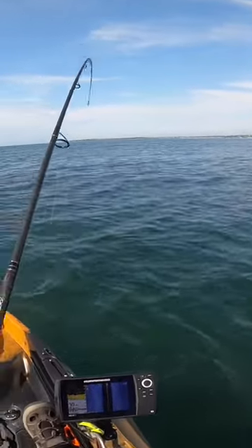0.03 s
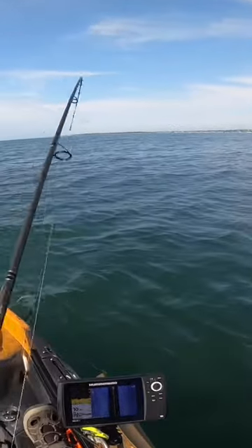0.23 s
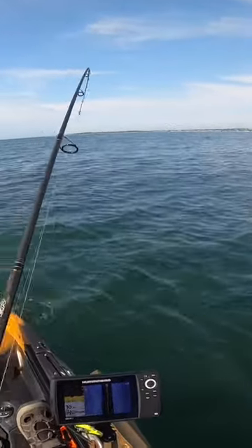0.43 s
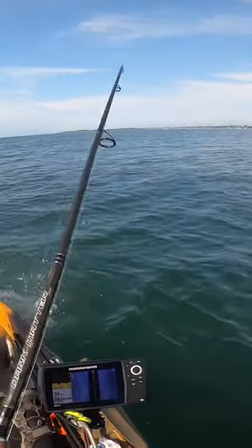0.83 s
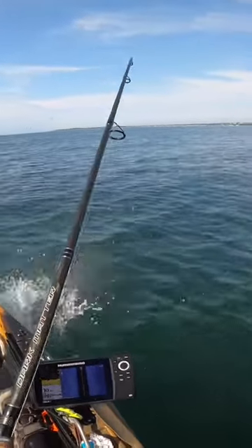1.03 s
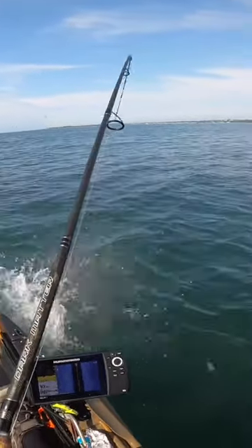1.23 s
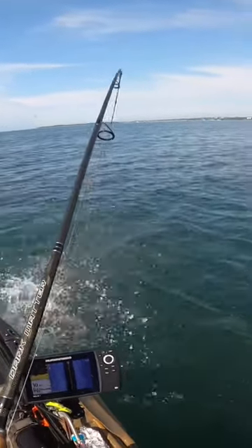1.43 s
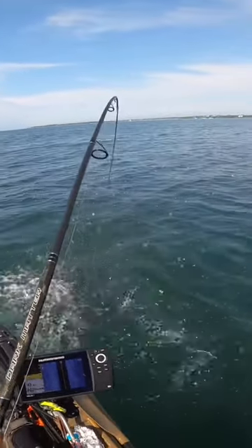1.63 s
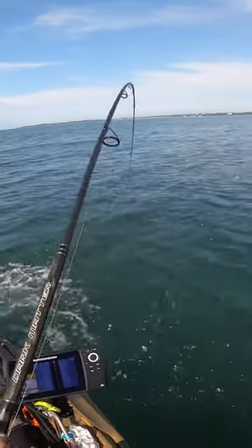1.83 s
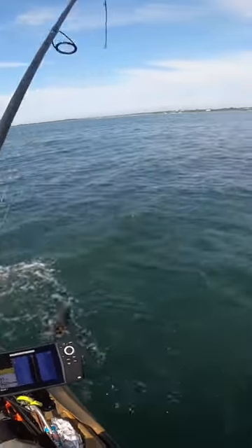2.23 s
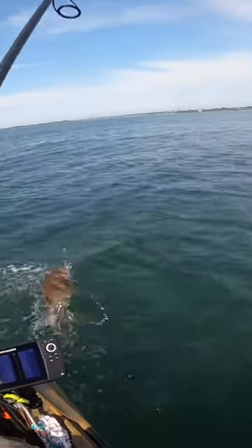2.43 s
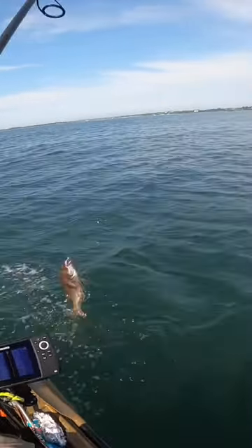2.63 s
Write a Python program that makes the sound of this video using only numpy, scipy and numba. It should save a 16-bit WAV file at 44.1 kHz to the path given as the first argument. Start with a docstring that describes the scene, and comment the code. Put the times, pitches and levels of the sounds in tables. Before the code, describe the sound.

A hooked fish thrashes close beside a kayak in quick, sharp splashes and low thumps. Spray patters down, foam fizzes and drips plop, then the hull knocks twice. Wind rumbles on the microphone over a low sea wash.

```python
"""A hooked fish thrashes at the surface beside a kayak. Each tail slap cracks and drives air under,
which thumps and churns. Spray patters back among ringing bubbles, white water fizzes, then single
drips plop. The hull knocks three times; a motor hums faintly over the wash of the sea, and wind
rumbles on the microphone's two ports."""
import sys
import numpy as np
from scipy import signal
from scipy.fft import rfft, irfft, next_fast_len
from scipy.io import wavfile
from numba import njit

SR = 44100
rng = np.random.default_rng(int(sys.argv[2]) if len(sys.argv) > 2 else 0)


def wrap_up_sound(samples):
    """Save the sound to the file named by the first command line argument, as 16-bit audio."""
    columns = np.atleast_2d(samples).T
    # keep every value between -1 and 1, then stretch to whole-number steps
    tamed = np.clip(columns, -1, 1)
    steps = np.round(tamed * 32767).astype(np.int16)
    wavfile.write(sys.argv[1], SR, steps)


N = 119070
T = np.arange(N) / SR

# wind on the microphone: t/s, level/dB
WIND_LEVEL = [(0, -36), (.18, -36), (.45, -47.5), (.62, -37), (.68, -33), (.735, -31), (.78, -41),
              (.87, -38), (1.05, -48), (1.4, -52), (2.7, -44)]
# wind spectrum: f/Hz, level/dB
WIND_SPECTRUM = [(15, -6), (30, 4), (55, 9.5), (85, 1), (150, -1.5), (400, -55), (4000, -100)]
# sea spectrum: f/Hz, level/dB
SEA_SPECTRUM = [(40, -31.5), (80, 12.5), (115, 4.5), (200, -2.5), (420, -6.5), (700, -25), (2000, -39),
                (6000, -71)]
# motor hum: multiple of shaft rate, level/dB
MOTOR_HARMONICS = [(6, -37.5), (10, -50), (22, -60.5)]
# foam bubbles: t/s, level/dB
FOAM_LEVEL = [(0, -64.5), (.5, -46.5), (.62, -36), (.95, -48.5), (1.2, -36), (1.32, -47), (1.45, -45.5),
              (1.72, -39.5), (2.02, -63), (2.5, -55)]
# slaps and falling sheets of water: t/s, crack/dB, rise/s, decay/s, tilt/(dB/octave), churn/dB
SLAPS = [(0.012, -43, 0.03, 0.074, 2.5, -41.5), (0.2396, -30, 0.00063, 0.0024, -3.5, -36),
         (0.393, -40.5, 0.0094, 0.026, 1.5, -37.5), (.531, -34, 0.0016, 0.013, 1, -33),
         (.586, -21.5, 0.006, 0.0063, -1.5, -25), (.593, -23.5, 0.0046, 0.007, 2.5, -29.5),
         (0.6308, -23.5, 0.0012, 0.0069, 4.5, -23), (.682, -26, 0.014, 0.0078, 4.5, -25.5),
         (0.693, -19, 0.0051, 0.0067, 1, -29.5), (0.7551, -30.5, 0.0016, 0.02, 5, -36),
         (0.7868, -12.5, 0.00068, 0.0036, 4, -18), (.862, -17, 0.0022, 0.003, 3.5, -26.5),
         (.966, -22.5, 0.0026, 0.0033, 7.5, -17.5), (1.0415, -26, 0.0097, 0.002, 3, -55),
         (1.0456, -19, 0.00089, 0.0058, 2.5, -42), (1.12, -28, 0.0055, 0.02, -2.4, -36.5),
         (1.2124, -26.5, 0.0016, 0.0078, -2.5, -38.5), (1.2658, -26, 0.0017, 0.011, 3, -63),
         (1.383, -29.5, 0.021, 0.074, 1, -56), (1.659, -35, 0.041, 0.005, -3, -74)]
# slap crack spectrum: f/Hz, level/dB
CRACK_SPECTRUM = [(150, 0.5), (450, 1.5), (720, 4.5), (1000, 10), (1450, 4), (2700, 1), (4200, -6.5),
                  (7000, -17.5), (10000, -33), (15500, -47)]
# churning water spectrum: f/Hz, level/dB
CHURN_SPECTRUM = [(50, -23), (110, 2), (240, -0.5), (400, -11), (1200, -21), (8000, -82)]
# surfacing bubbles: t/s, start f/Hz, level/dB, decay/s
CHIRPS = [(.193, 791, -25.5, 0.0035), (.3075, 710, -16, 0.0025), (0.46, 994, -26, 0.0063)]
# bubbles of drips and gulps: t/s, start f/Hz, level/dB, decay/s
PLOPS = [(.219, 2000, -36.5, 0.0043), (.278, 493, -25, 0.013), (1.184, 918, -24, 0.012),
         (1.211, 800, -28, 0.0043), (1.235, 980, -21.5, 0.0044), (1.266, 820, -17.5, 0.0033),
         (1.354, 1225, -24, 0.0061), (1.361, 890, -18, 0.0064), (1.368, 614, -19, 0.0062),
         (1.375, 449, -18, 0.0079), (1.383, 633, -16, 0.011), (1.527, 675, -25, 0.0093),
         (1.659, 960, -17, 0.0044), (1.664, 1236, -22, 0.0063), (1.744, 960, -20, 0.002),
         (1.754, 1106, -29.5, 0.0071), (1.846, 920, -23, 0.0063), (1.864, 2300, -25, 0.0027),
         (1.93, 1300, -31.5, .003), (2.138, 2380, -34.5, 0.0038), (2.282, 2720, -36, 0.0051),
         (2.351, 1810, -36.5, 0.0048), (2.388, 3300, -33, 0.0022), (2.4013, 1210, -26, 0.00208),
         (2.547, 1920, -27, 0.0016)]
# drops landing close by: t/s, level/dB
TICKS = [(0.2404, -55), (0.308, -48), (.404, -42), (0.45, -42.5), (1.18, -32.5), (1.877, -33), (1.903, -37),
         (1.932, -36.5), (1.973, -36), (2.049, -44), (2.062, -40.5), (2.2638, -36.5), (2.498, -40.5),
         (2.581, -40), (2.641, -40.5)]
# close drop spectrum: f/Hz, level/dB
TICK_SPECTRUM = [(900, -29), (3000, 14.5), (5000, 9.5), (8000, 2.5), (15000, -27)]
# hull knocks: t/s, level/dB
KNOCKS = [(0.24, -33.5), (2.086, -26.5), (2.2205, -29.5)]
# hull modes: f/Hz, level/dB, t60/s
HULL_MODES = [(165, -0.5, 0.17), (201, 2, 0.066), (424.4, -3, 0.11), (482, -8.5, 0.14), (738, -12.5, 0.077),
              (1143, -16, 0.085), (1258, 0.5, 0.026), (1720, -5, 0.024), (2610, -1, 0.0071)]
# falling spray: t/s, level/dB
SPRAY_LEVEL = [(.36, -60.5), (.5, -56.5), (.57, -49), (.70, -33.5), (.74, -43), (.88, -36.5), (.94, -39.5),
               (1.06, -38), (1.22, -36.5), (1.33, -41.5), (1.43, -39), (1.61, -36.5), (1.76, -45),
               (2.02, -53.5), (2.3, -66.5), (2.42, -54), (2.7, -52.5)]
# spray spectrum: f/Hz, level/dB
SPRAY_SPECTRUM = [(150, -4.5), (330, -1), (680, -8.5), (820, -12.5), (960, 0.5), (1500, -10), (2100, 0),
                  (3300, -1.5), (5000, -8), (7500, -12.5), (10000, -21.5), (15500, -40)]
# air pockets under the tail: t/s, start f/Hz, level/dB, decay/s
POCKETS = [(0.5946, 209, -12.5, 0.01), (0.64, 486, -22.5, 0.018), (0.644, 114, -20, 0.012),
           (0.702, 54.6, -17.5, 0.048), (0.7905, 139.4, -2.5, 0.011), (.792, 625, -18.5, 0.014),
           (.821, 241, -9, 0.0055), (0.8389, 450, -1.5, 0.00097), (0.844, 100, -10.5, 0.0088),
           (0.858, 176.4, -18, 0.026), (0.9691, 314, -5.5, 0.0046), (0.9748, 121.7, -13, 0.018),
           (.988, 244.3, -13, 0.011), (1.001, 242, -14, 0.009)]
# white water spectrum: f/Hz, level/dB
FIZZ_SPECTRUM = [(1500, -30), (5000, -1.5), (7500, -0.5), (11000, -12), (15500, -17)]
# scatter off deck and water, side against mid: f/Hz, level/dB
SCATTER = [(130, -36), (330, -12), (1000, -15.5), (2400, -20), (5000, -11), (12000, -1)]
# port shadow, left minus right: f/Hz, level/dB
SHADOW = [(2300, 1), (4500, -0.7), (9000, -3.5)]


def undb(db):
    return 10 ** (np.asarray(db) / 20)


def unit(x):
    """Scale to rms 1."""
    return x / np.sqrt(np.mean(x ** 2) + 1e-20)


def curve(rows):
    """Gain along rows of t/s, level/dB."""
    return undb(np.interp(T, *np.array(rows).T))


def colour(x, spectrum, tilt_db_per_oct=0):
    """Minimum-phase filter through rows of f/Hz, level/dB."""
    size = next_fast_len(2 * len(x), real=True)
    octave = np.log2(np.maximum(np.fft.rfftfreq(size, 1 / SR), 1))
    hz, db = np.array(spectrum).T
    gain = undb(np.interp(octave, np.log2(hz), db + tilt_db_per_oct * np.log2(hz / hz[0])))
    cepstrum = irfft(np.log(gain), size)
    cepstrum[1:size // 2] *= 2
    cepstrum[size // 2 + 1:] = 0
    return irfft(rfft(x, size) * np.exp(rfft(cepstrum)), size)[:len(x)]


def noise(spectrum):
    """Coloured noise, rms 1."""
    return unit(colour(rng.standard_normal(N), spectrum))


def walk(rate_hz, size=N):
    """Random wander, spread near 1."""
    steps = rng.standard_normal(2048)
    return np.interp(T[:size] * rate_hz, np.arange(len(steps)), steps)


def spread(mid, twin):
    """Stereo: an unrelated twin, scattered by deck and water, is the side signal."""
    return mid + colour(twin, SCATTER) * np.array([[1], [-1]])


def add_burst(out, at_s, db, rise_s, decay_s, spectrum, tilt_db_per_oct=0, size=16384):
    """A splash, grainy with tiny cracks, swells up to at_s and dies away."""
    grain_hz, grain_db = 1100, 3.5
    start = max(int(at_s * SR) - size // 4, 0)
    t = T[start:start + size] - at_s
    envelope = np.exp(-np.maximum(t, 0) / decay_s - (np.minimum(t, 0) / rise_s) ** 2)
    grain = undb(grain_db * np.clip(walk(grain_hz, size), -2, 2))
    rush = unit(colour(grain * rng.standard_normal(size), spectrum, tilt_db_per_oct))
    out[start:start + size] += undb(db) * envelope * rush[:len(t)]


@njit
def ring(rows, glide, onset_cycles):
    """Damped sines; glide is the fractional pitch rise per decay time."""
    out = np.zeros(N)
    for at_s, hz, db, decay_s in rows:
        for i in range(max(int(at_s * SR) + 1, 0), min(int((at_s + 7 * decay_s) * SR), N)):
            t = i / SR - at_s
            envelope = 10 ** (db / 20) * np.exp(-t / decay_s) * (1 - np.exp(-t * hz / onset_cycles))
            out[i] += envelope * np.sin(2 * np.pi * hz * t * (1 + glide * t / decay_s / 2))
    return out


def swarm(centre_hz, decay_cycles, count, width_oct=0.643, spread_db=2, tilt_db_per_oct=-2.5):
    """Bubbles of many sizes ring at random times, the higher ones weaker."""
    octave = np.clip(width_oct * rng.standard_normal(count), -2, 2)
    hz = centre_hz * 2 ** octave
    db = spread_db * np.minimum(rng.exponential(size=count), 4)
    db += tilt_db_per_oct * np.maximum(octave, -0.5)
    rows = np.column_stack([rng.random(count) * N / SR, hz, db, decay_cycles / hz])
    return unit(ring(rows, glide=0.019, onset_cycles=0.39))


def wind(side_gain=0.39, pan_db=3):
    """Gusts buffet both ports, partly alike, the left harder."""
    sides = np.array([[1], [-1]])
    rumble = noise(WIND_SPECTRUM) + side_gain * noise(WIND_SPECTRUM) * sides
    return rumble * curve(WIND_LEVEL) * undb(sides * pan_db / 2)


def sea(level_db=-40):
    """Steady low wash."""
    return undb(level_db) * spread(noise(SEA_SPECTRUM), noise(SEA_SPECTRUM))


def motor(shaft_hz=17.95, waver=0.011, flutter_db=0.7):
    """Low hum on multiples of the shaft rate."""
    angle = 2 * np.pi * np.cumsum(shaft_hz * (1 + waver * walk(5.12))) / SR
    hum = np.zeros(N)
    for multiple, db in MOTOR_HARMONICS:
        gain = undb(db + flutter_db * walk(40))
        hum += gain * unit(np.sin(multiple * angle + 2 * np.pi * rng.random()))
    return hum


def foam(plink_db=-4.5):
    """Foam gurgles; the tiniest bubbles plink as spray lands."""
    gurgle = swarm(centre_hz=1421, decay_cycles=4.7, count=1200)
    plinks = swarm(centre_hz=3066, decay_cycles=4.5, count=700)
    return gurgle * curve(FOAM_LEVEL) + undb(plink_db) * plinks * curve(SPRAY_LEVEL)


def slaps(churn_lag_s=0.00804):
    """Each slap cracks; the water churns just after."""
    out = np.zeros(N)
    for at_s, crack_db, rise_s, decay_s, tilt_db_per_oct, churn_db in SLAPS:
        add_burst(out, at_s, crack_db, rise_s, decay_s, CRACK_SPECTRUM, tilt_db_per_oct)
        add_burst(out, at_s + churn_lag_s, churn_db, rise_s=0.011, decay_s=0.032, spectrum=CHURN_SPECTRUM)
    return out


def chirps():
    """Bubbles swell and chirp upward as they surface."""
    return ring(np.array(CHIRPS, float), glide=0.143, onset_cycles=2.8)


def drips(splash_db=-15):
    """The surface splashes as each plop's bubble forms; close drops tick."""
    out = np.zeros(N)
    for at_s, hz, db, _ in PLOPS:
        spectrum = [(hz / 4, -20), (hz, 0), (hz * 2, -8), (16000, -46)]
        add_burst(out, at_s, db + splash_db, rise_s=0.0024, decay_s=0.0066, spectrum=spectrum, size=4096)
    for at_s, db in TICKS:
        add_burst(out, at_s, db, rise_s=0.0017, decay_s=0.0026, spectrum=TICK_SPECTRUM, size=2048)
    return out


def plops(steady_hz=1670, shed_oct=0.7, shed_db=-11):
    """Each drip's bubble rings and sheds three short-lived ones, which gurgle."""
    out = np.zeros(N)
    for at_s, hz, db, decay_s in PLOPS:
        rows = [(at_s, hz, db, decay_s)]
        for _ in range(3):
            delay_s = 3 * decay_s * rng.random()
            shed_hz = hz * 2 ** (shed_oct * rng.uniform(-0.98, 1))
            rows.append((at_s + delay_s, shed_hz, db + shed_db, decay_s / 2))
        glide = 0.0653 * np.log2(steady_hz / hz)  # low plops rise, high ones sag
        out += ring(np.array(rows, float), glide, onset_cycles=0.39)
    return out


def hull():
    """Dull knocks ring the plastic hull's modes."""
    rows = [(at_s, hz, knock_db + mode_db, t60_s / np.log(1000))
            for at_s, knock_db in KNOCKS for hz, mode_db, t60_s in HULL_MODES]
    return ring(np.array(rows, float), glide=0.0, onset_cycles=0.23)


def spray(drops_per_s=3600, spread_db=1.5, clump_db=3):
    """Drops of uneven size click on the water in clumps."""
    strength = undb(spread_db * np.minimum(rng.exponential(size=N), 4.5)) * rng.choice([-1, 1], N)
    lands = rng.random(N) < drops_per_s / SR
    clicks = strength * lands * undb(clump_db * walk(80))
    twin = clicks * rng.standard_normal(N)
    patter = spread(colour(clicks, SPRAY_SPECTRUM), colour(twin, SPRAY_SPECTRUM))
    return unit(patter) * curve(SPRAY_LEVEL)


def air_pockets():
    """Big air pockets driven under by the tail thump."""
    return ring(np.array(POCKETS, float), glide=0.015, onset_cycles=0.19)


def fizz(start_s=0.96, start_db=-54.5, fade_db_per_s=5, pops_per_s=4700):
    """White water bursts in tiny pops and slowly clears."""
    pops = rng.standard_normal((2, N)) * (rng.random(N) < pops_per_s / SR)
    fade = (T > start_s) * undb(start_db - fade_db_per_s * (T - start_s))
    return unit(spread(colour(pops[0], FIZZ_SPECTRUM), colour(pops[1], FIZZ_SPECTRUM))) * fade


def ports(stereo, lag_s=45e-6, corner_hz=6100):
    """The left port's treble is shadowed, and it hears later below about corner_hz."""
    left = colour(stereo[0], [(hz, db / 2) for hz, db in SHADOW])
    right = colour(stereo[1], [(hz, -db / 2) for hz, db in SHADOW])
    hz = np.fft.rfftfreq(N, 1 / SR)
    delay_s = lag_s / (1 + (hz / corner_hz) ** 2)
    late_left = irfft(rfft(left) * np.exp(-2j * np.pi * hz * delay_s), N)
    return np.array([late_left, right])


def scene():
    splashes = spread(slaps() + drips(), slaps() + drips())
    white_water = spray() + fizz() + spread(foam(), foam())
    trapped_air = chirps() + plops() + air_pockets()
    return ports(splashes + white_water + trapped_air + sea() + hull() + motor()) + wind()


def record(dry):
    """Steep low-pass."""
    cutoff_hz = 15700
    return signal.sosfilt(signal.ellip(8, 0.2, 80, cutoff_hz, fs=SR, output="sos"), dry)


dry = scene()
out = record(dry)
wrap_up_sound(out)
```